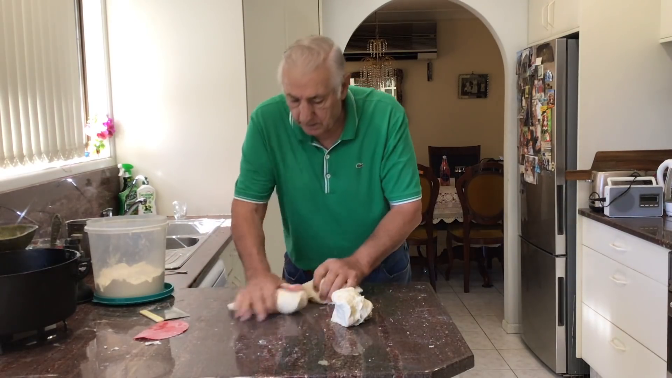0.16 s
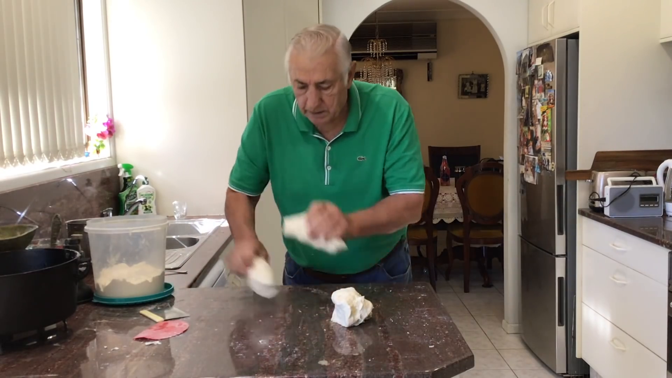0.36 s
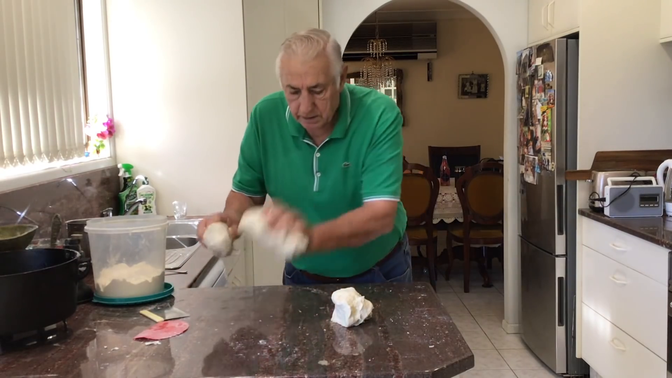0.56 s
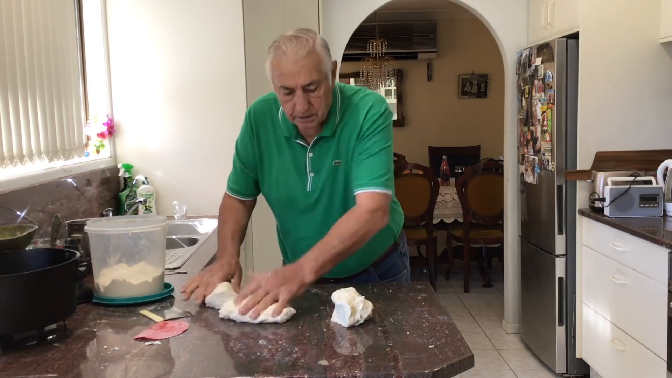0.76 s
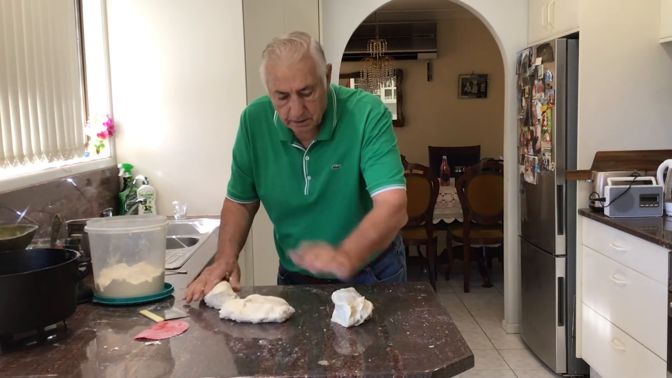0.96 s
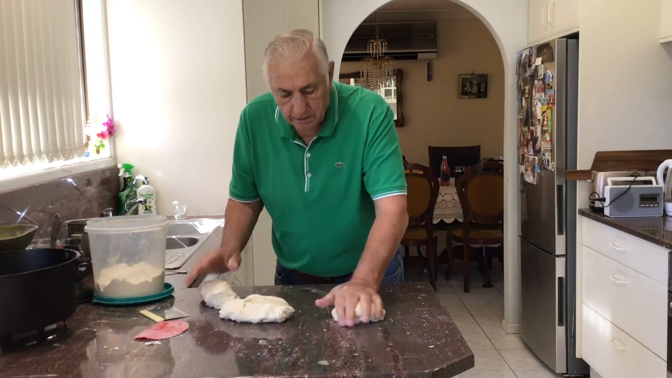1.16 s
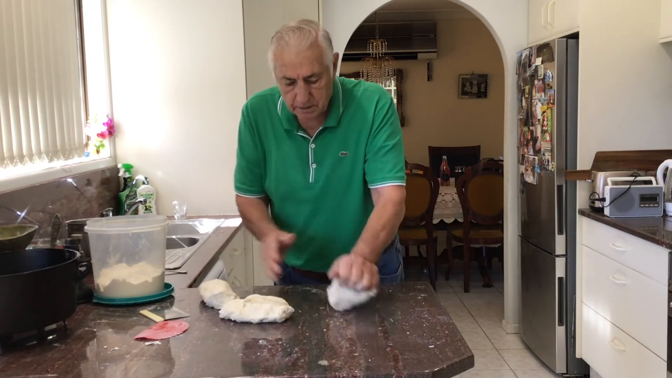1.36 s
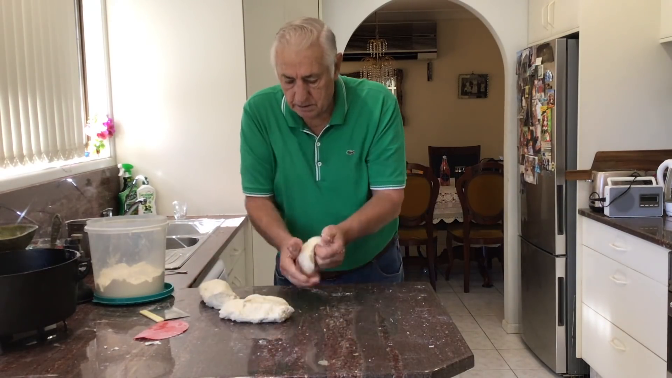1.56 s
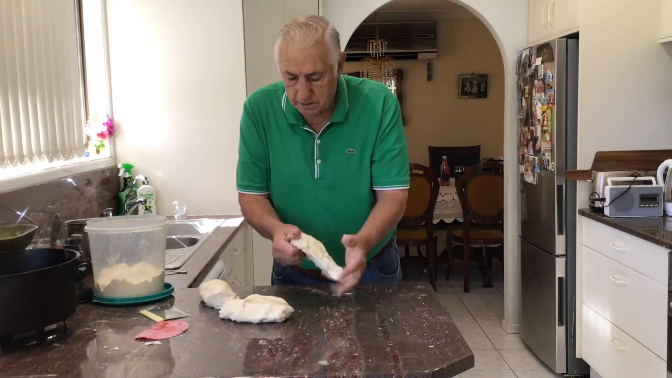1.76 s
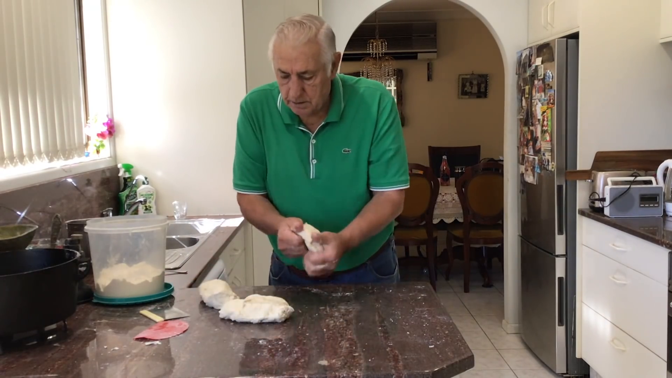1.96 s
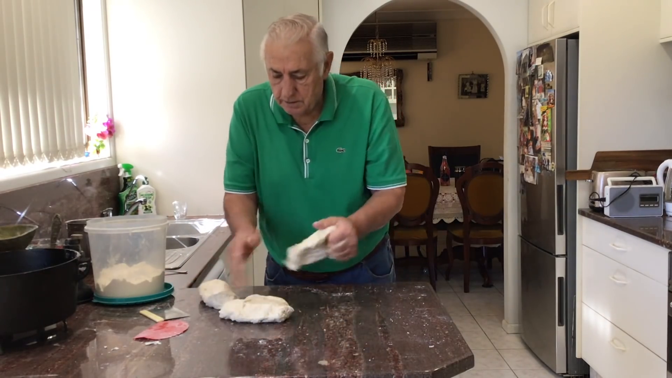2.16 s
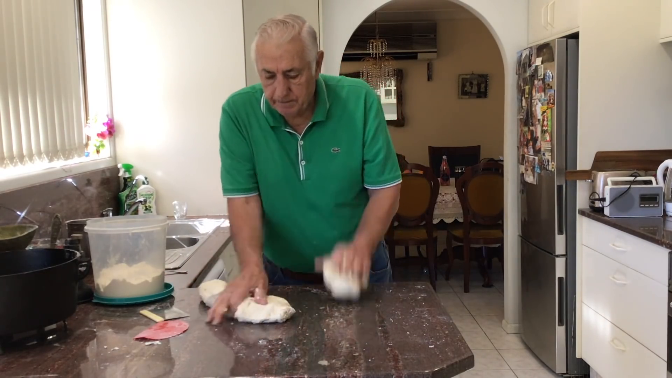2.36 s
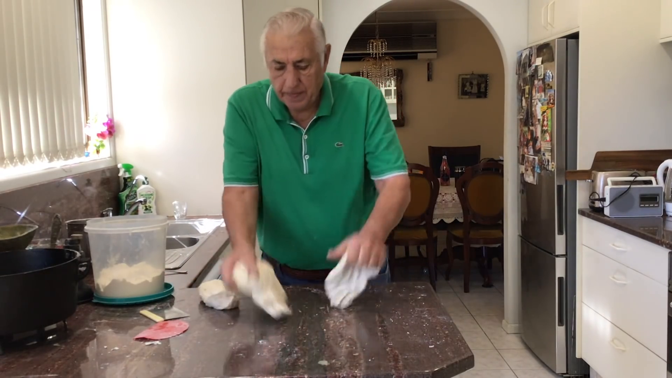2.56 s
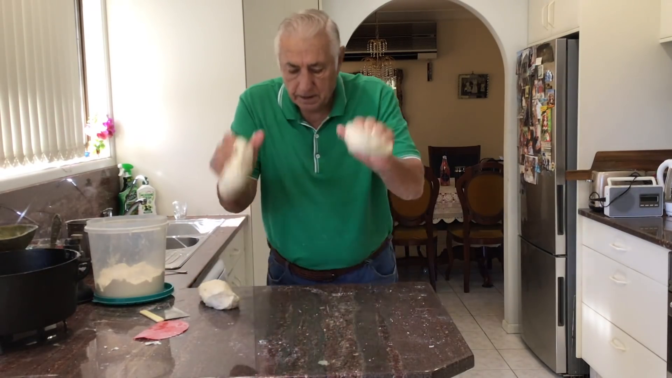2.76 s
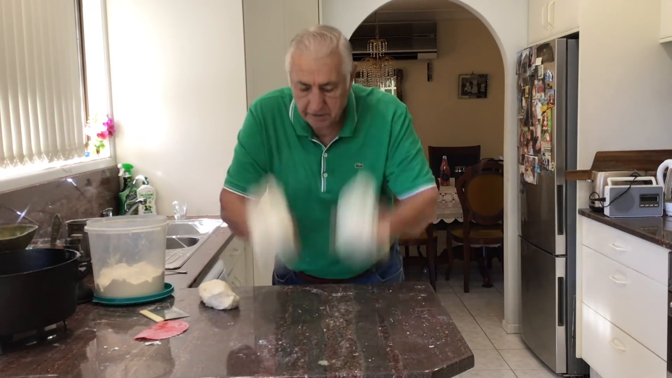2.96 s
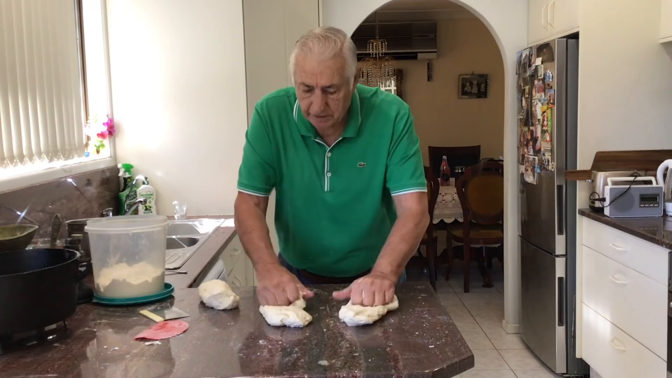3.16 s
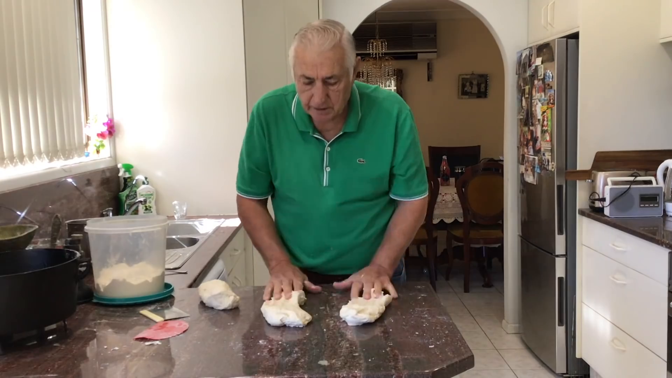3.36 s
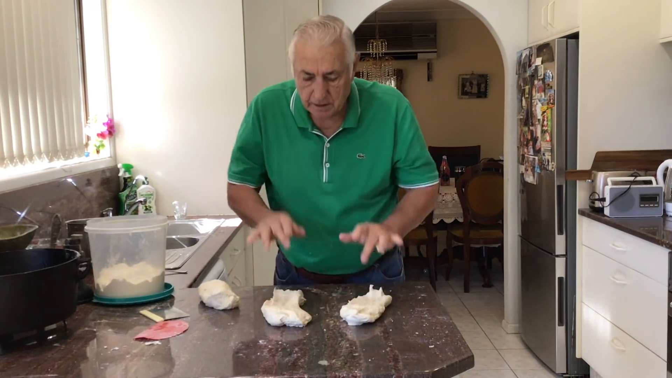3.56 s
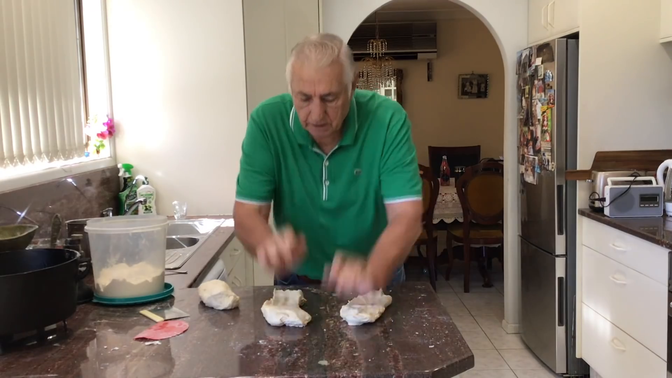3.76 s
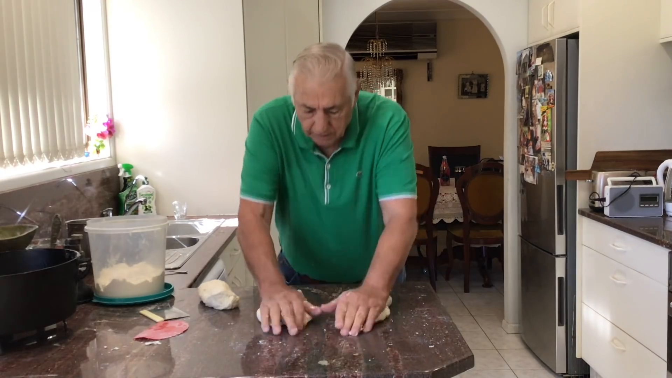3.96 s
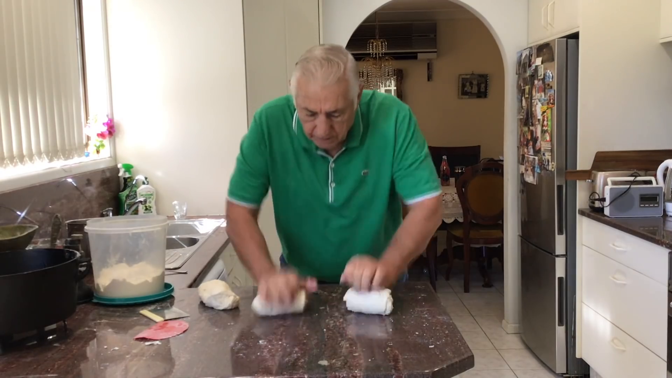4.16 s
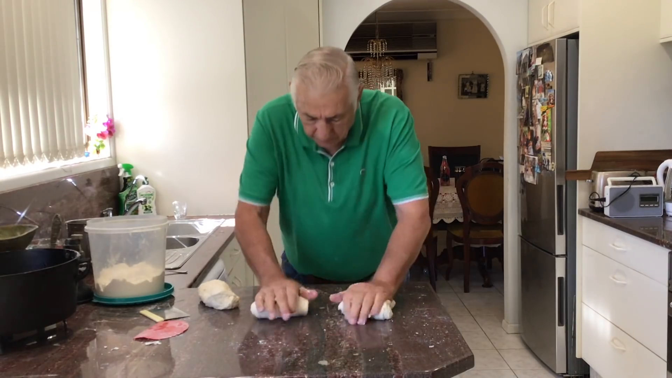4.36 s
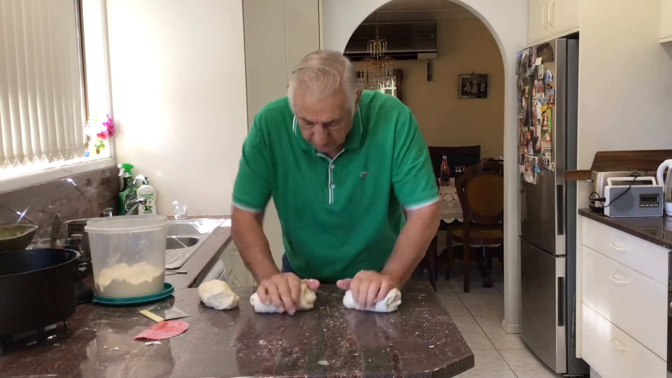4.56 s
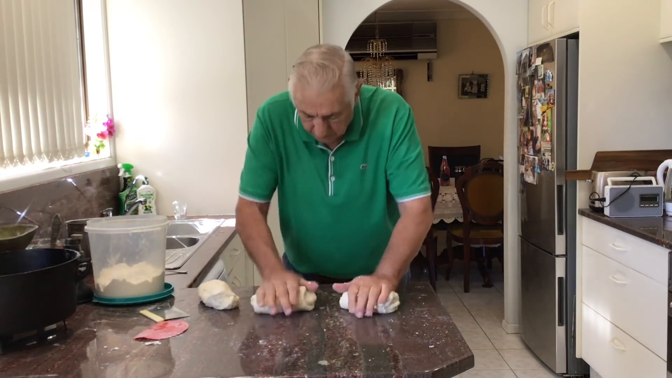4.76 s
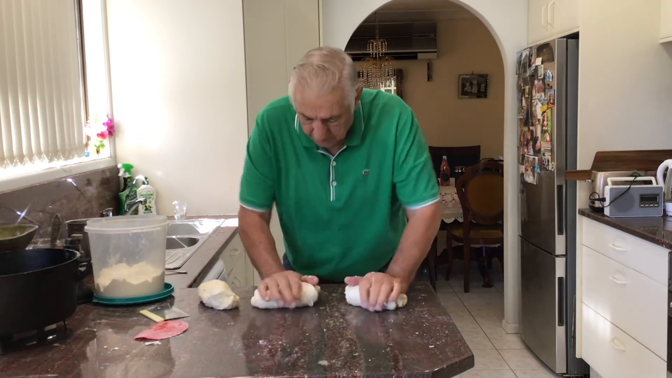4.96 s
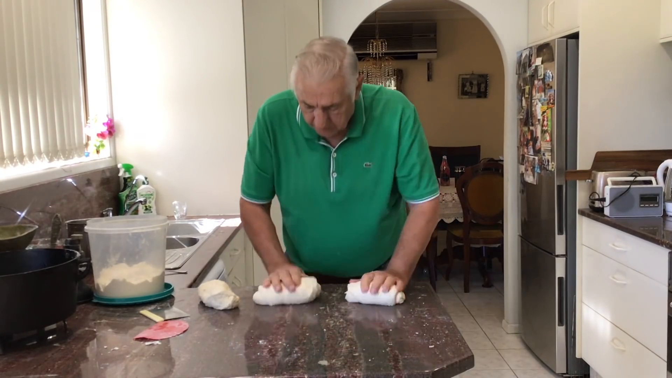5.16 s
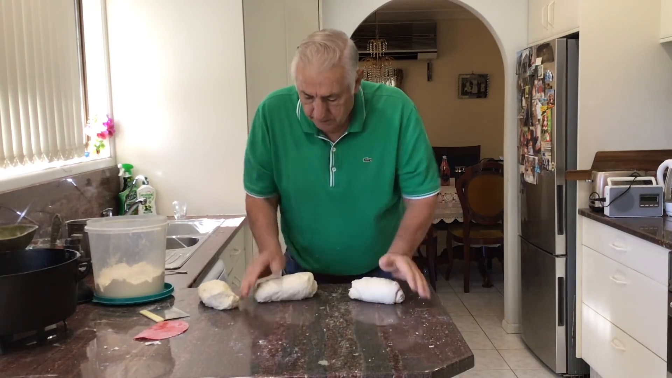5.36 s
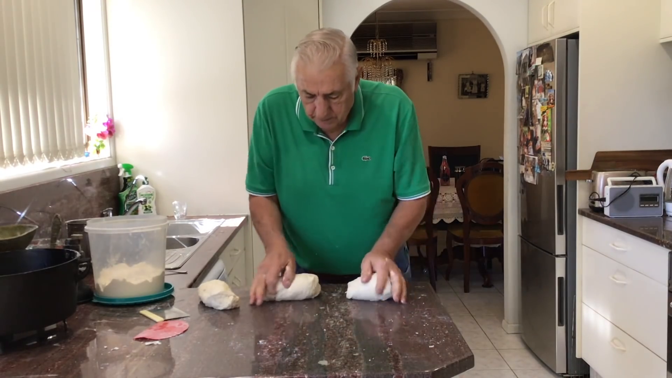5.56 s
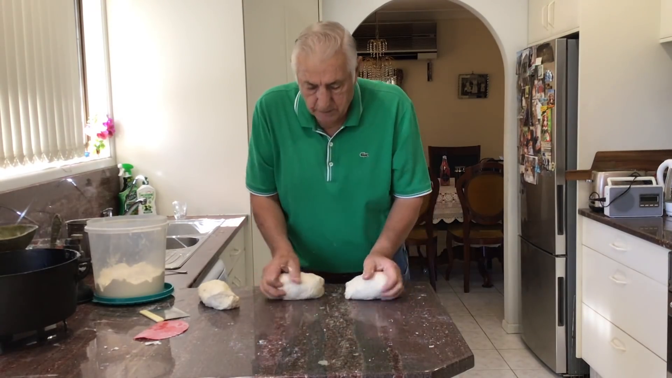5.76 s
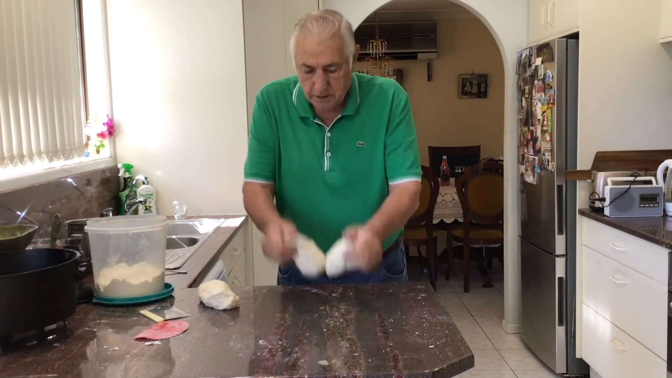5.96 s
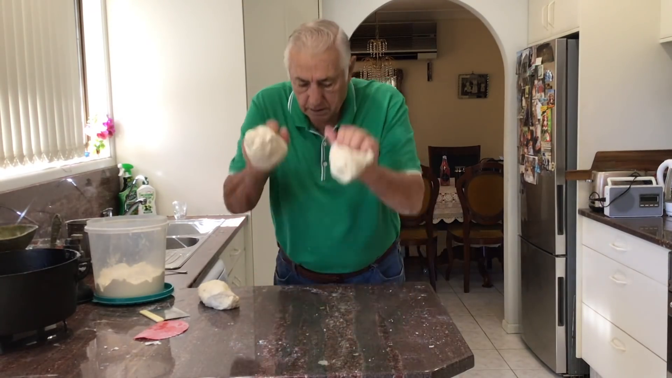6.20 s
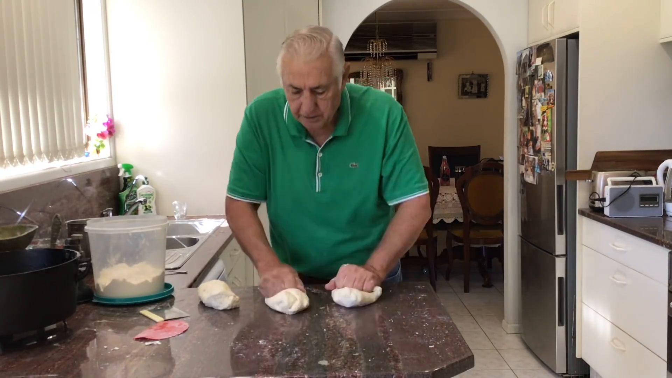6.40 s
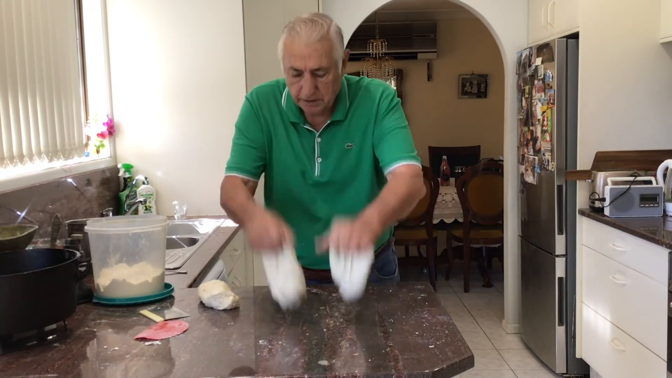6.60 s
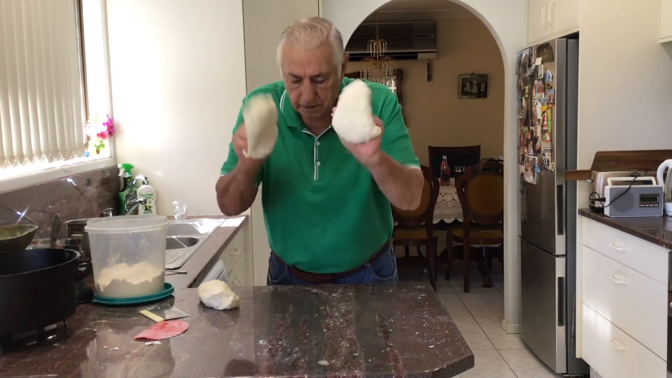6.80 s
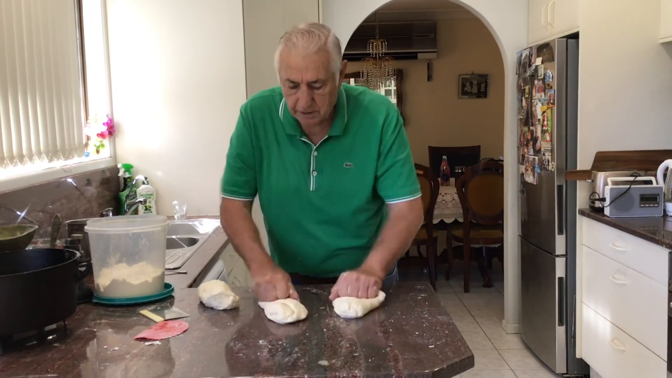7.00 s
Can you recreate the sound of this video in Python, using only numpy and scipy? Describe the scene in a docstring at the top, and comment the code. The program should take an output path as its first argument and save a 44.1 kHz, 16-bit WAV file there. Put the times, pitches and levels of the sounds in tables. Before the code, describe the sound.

In a tiled kitchen, a person works dough on a stone bench. A quiet swish leads to a firm slap, then faint pats and another slap. A very loud double smack cracks and overloads the microphone. Soft patting, pressing and floury rubbing follow with a tiny hard tick, before a second loud double slap. The room echoes briefly over a faint low hum.

```python
"""Dough slapped on a stone bench.

Lumps of dough are slapped, patted and stroked by hand on a stone benchtop in a tiled kitchen.
Each contact is a filtered-impulse smack, a resonant pop of trapped air and a modal thump in the bench,
with reflections and a noise tail. Floury hands swish and press in shaped noise over a quiet noise hum
and faint sine tones; one thin tick is a sum of decaying sines. The loudest peaks clip."""
import sys
import numpy as np
from scipy import signal
from scipy.fft import rfft, irfft, next_fast_len
from scipy.io import wavfile
from scipy.ndimage import uniform_filter1d, map_coordinates

SR = 44100
rng = np.random.default_rng(int(sys.argv[2]) if len(sys.argv) > 2 else 0)


def attenuation_scalar(level_db):
    """Turn a level in dB into a linear amplitude multiplier (20 dB per decade)."""
    decades = np.asarray(level_db, float) / 20
    return 10 ** decades


def transcribe(u):
    """Save the signal u as a 16-bit wav file named by the first command-line argument.

    u: samples, shape (n,) or (channels, n), limited to [-1, 1]; the rate is SR.
    q: integer samples, one column per channel.
    """
    v = np.clip(np.atleast_2d(u).T, -1, 1)
    q = np.round(v * 32767).astype(np.int16)
    wavfile.write(sys.argv[1], SR, q)


N = 310287


def unit(x):
    """Scale to rms 1."""
    return x / np.sqrt(np.mean(x ** 2) + 1e-20)


def along(points, hz):
    """Interpolate (Hz, value) points on a log frequency axis."""
    point_hz, value = np.transpose(points)
    return np.interp(np.log(hz + 1), np.log(point_hz + 1), value)


def filtered(x, response):
    """Multiply the spectrum of x by a complex response of frequency."""
    size = next_fast_len(len(x) + 8192)
    spectrum = rfft(x, size) * response(np.fft.rfftfreq(size, 1 / SR))
    return irfft(spectrum, size)[:len(x)]


def rush(spectrum, patchy_db):
    """Coloured noise of rms 1 whose gain varies in random time-frequency patches."""
    z = signal.stft(rng.standard_normal(N + 512), nperseg=512)[2]
    field = uniform_filter1d(rng.standard_normal(z.shape), 6, axis=0)
    field = uniform_filter1d(field, 8, axis=1)
    noise = signal.istft(z * attenuation_scalar(patchy_db * unit(field)), nperseg=512)[1][:N]
    return unit(filtered(noise, lambda hz: attenuation_scalar(along(spectrum, hz))))


# Swish spectrum. Each row: frequency in Hz, relative density in dB per Hz.
SWISH = [(410, -28.5), (700, -7), (1540, -3.5), (2370, -5), (3070, -6.5), (4610, -8.5), (10100, -13),
         (14000, -15.5), (16000, -23)]
# Pressing spectrum. Each row: frequency in Hz, relative density in dB per Hz.
PRESS = [(24, -42.5), (40, -9), (70, -0.5), (172, -3), (389, 4), (503, 2.5), (806, -8), (1500, -21.5),
         (1950, -45), (3300, -120)]
# Strokes of floury hands over dough and stone.
# Each row: start in seconds, length in seconds, swish in dB rms, pressing in the bench in dB rms.
STROKES = [(0.0, 0.04, -62.5, -63), (0.175, 0.12, -58.5, -57.5), (1.372, .05, -64, -62.5),
           (1.53, 0.13, -72, -61.5), (1.75, 0.12, -66, -64), (2.16, 0.027, -57.5, -81),
           (2.366, 0.041, -63, -59), (2.923, 0.012, -76.5, -61), (3.674, .05, -69, -63),
           (4.08, .12, -58, -63), (4.6, .04, -56.5, -51), (4.852, 0.068, -54.5, -54.5),
           (4.984, 0.03, -63, -63.5), (5.166, 0.14, -61.5, -57), (5.419, 0.18, -69, -57.5),
           (5.849, 0.14, -75.5, -59.5)]
RISE_DB_PER_S, FALL_DB_PER_S = 231, 117.5
REST_SWISH_DB, REST_PRESS_DB = -75.5, -63.5  # hands idling on the dough between strokes


def hands():
    """Flour swishes in fine grains under the palms; kneading presses uneven low lumps into the bench."""
    start_s, length_s, swish_db, press_db = np.transpose(STROKES)[..., None]
    now_s = np.arange(N) / SR
    rise_db = -RISE_DB_PER_S * np.maximum(start_s - now_s, 0)
    fall_db = -FALL_DB_PER_S * np.maximum(now_s - start_s - length_s, 0)

    def level(stroke_db, rest_db):
        power = np.sum(attenuation_scalar(stroke_db + rise_db + fall_db) ** 2, axis=0)
        return np.sqrt(power + attenuation_scalar(rest_db) ** 2)

    grain_db = 1.7 * uniform_filter1d(rng.standard_normal(N), 64) * np.sqrt(64)
    lump_db = 0.8 * map_coordinates(rng.standard_normal(200), [now_s * 25])
    swish = unit(attenuation_scalar(grain_db) * rush(SWISH, patchy_db=-0.5))
    press = unit(attenuation_scalar(lump_db) * rush(PRESS, patchy_db=3.5))
    return level(swish_db, REST_SWISH_DB) * swish + level(press_db, REST_PRESS_DB) * press


# Hum spectrum of the house. Each row: frequency in Hz, relative density in dB per Hz.
HUM = [(15, -58.5), (25, -46.5), (59, 1.5), (229, -3), (373, -16.5), (545, -16), (962, -20), (1100, -19.5),
       (1480, -19.5), (2110, -20), (3250, -25), (12500, -34), (16000, -44.5)]


def hum():
    """Steady house hum: low-weighted noise with patchy gain."""
    hum_db_rms = -60.5
    return attenuation_scalar(hum_db_rms) * rush(HUM, patchy_db=3.0)


# Faint pairs of thin tones in the house.
# Each row: start in seconds, length in seconds, low tone in Hz, high tone in Hz, median level of each in dB rms.
TONES = [(0.0, .25, 1480, 1836, -74), (1.75, .27, 1357, 1720, -74.5), (2.2, .15, 1300, 1700, -78),
         (3.635, .17, 1494, 1763, -76), (5.198, 0.43, 1533, 1796, -78)]
TONE_FADE_S, TONE_WAVER_HZ, TONE_WAVER_DB = 0.074, 20.4, 3.8


def tones():
    """Sine pairs fade in and out and waver in pitch and level."""
    out, now_s = np.zeros(N), np.arange(N) / SR

    def waver():
        return map_coordinates(rng.standard_normal(400), [now_s * 50])

    for start_s, length_s, low_hz, high_hz, db in TONES:
        inside_s = np.minimum(now_s - start_s, start_s + length_s - now_s)
        fade = np.clip(inside_s / TONE_FADE_S + 1, 0, 1)
        for hz in (low_hz, high_hz):
            level = attenuation_scalar(db + TONE_WAVER_DB * waver())
            cycles = np.cumsum(hz + TONE_WAVER_HZ * waver()) / SR
            out += fade * level * np.sqrt(2) * np.sin(2 * np.pi * cycles)
    return out


# Decay of the tiled kitchen. Each row: frequency in Hz, t60 in seconds.
KITCHEN = [(60, 0.76), (160, 0.59), (420, 0.54), (1100, 0.56), (3000, 0.57), (7700, 0.45), (14000, 0.34)]


def kitchen(x, build_s=0.0024, uneven_db=0.92):
    """A fresh noise tail of energy 1: builds up, is unevenly coloured by cupboards and tiles, decays per band."""
    hz, t_s, z = signal.stft(rng.standard_normal(SR), SR, nperseg=512, noverlap=384)
    colour_db = uneven_db * unit(uniform_filter1d(rng.standard_normal(len(hz)), size=3))
    decay_db = -60 * t_s / along(KITCHEN, hz)[:, None]
    z = z * attenuation_scalar(colour_db[:, None] + decay_db)
    tail = signal.istft(z, SR, nperseg=512, noverlap=384)[1][:SR]
    tail *= 1 - np.exp(-np.arange(SR) / SR / build_s)
    return signal.fftconvolve(x, tail / np.linalg.norm(tail))


def causal(gain):
    """Minimum-phase response with this gain, by folding the cepstrum."""
    cepstrum = irfft(np.log(np.maximum(gain, 1e-6)))
    cepstrum[1:len(cepstrum) // 2] *= 2
    cepstrum[len(cepstrum) // 2 + 1:] = 0
    return np.exp(rfft(cepstrum))[:len(gain)]


def resonances(modes, hz):
    """Sum of second-order resonances (centre, width, dB) of alternating sign."""
    total = 0
    for k, (centre, width, db) in enumerate(modes):
        total = total + (-1) ** k * attenuation_scalar(db) * 1j * hz * width / (centre ** 2 - hz * hz + 1j * hz * width)
    return total


# Skin smack spectrum. Each row: frequency in Hz, relative density in dB per Hz.
SMACK = [(200, -27), (900, 0.5), (1500, -3.5), (3000, -6.5), (6000, -11), (11000, -11), (16000, -19)]
# Air under the lump. Each row: ratio to the pop pitch, width as a ratio to the pop pitch, relative level in dB.
POCKET = [(.72, 0.29, 1), (1, 0.29, 5.5), (1.35, 0.32, 0), (2.1, 0.74, -24.5)]
# Modes of slab and cabinets. Each row: frequency in Hz, width in Hz, relative level in dB.
BENCH = [(80.9, 18, -1.5), (163.6, 35, 3), (246, 62, 5), (291, 26, 7.5), (374.4, 34, -5.5)]


def contact(smack_db, peak_hz, width_hz, thump_db, pop_db, pop_hz):
    """Bright smack of the skin as one impulse; pop of escaping air and push of the mass on the bench."""
    t_s = np.arange(SR // 4) / SR

    def push(peak_s):
        return t_s / peak_s * np.exp(1 - t_s / peak_s)

    def smack_response(hz):
        detune = (hz ** 2 - peak_hz ** 2) / (hz * width_hz + 1)
        peak = 1.5 * np.sqrt(2000 / width_hz) / np.sqrt(1 + detune ** 2)  # narrower is taller
        return causal(attenuation_scalar(along(SMACK, hz)) * (1 + peak))

    smack = filtered(1. * (t_s == 0), smack_response)
    pop = filtered(push(0.000083), lambda hz: resonances(POCKET, hz / pop_hz))
    thump = filtered(push(0.00073), lambda hz: resonances(BENCH, hz))
    smack *= attenuation_scalar(smack_db) / np.linalg.norm(smack)
    pop *= attenuation_scalar(pop_db) / np.abs(pop).max()
    thump *= attenuation_scalar(thump_db) / np.abs(thump).max()
    return smack, pop + thump


# Thrown lumps and full palms landing.
# Each row: time in seconds, smack in dB, direct crack in dB re smack, bright peak in Hz,
# air pop in dB peak, air pop in Hz, thump in dB peak.
SLAPS = [(.696, -18.5, 17.5, 4800, -24, 497, -27.5), (2.4506, -21, 25, 9600, -22.5, 540, -31.5),
         (2.577, -34.5, 8.5, 1475, -56, 484, -47.5), (3.0705, -4.5, 18.5, 4700, -14, 705, -16.5),
         (3.085, -3, 8.5, 4540, -13.5, 412, -23), (3.852, -31, 18, 2530, -32.5, 536, -48),
         (3.878, -30.5, 21.5, 4660, -41, 470, -35), (6.379, -17, 14, 3130, -13, 612, -40.5),
         (6.3907, -6, 18, 5960, -7, 568, -18.5)]
SLAP_WIDTH_HZ = 1200  # breadth of the bright peak
# Light touches of palm and fingers.
# Each row: time in seconds, smack in dB, direct crack in dB re smack, bright peak in Hz, air pop in dB peak.
PATS = [(1.063, -42, 19, 2480, -42), (1.088, -50.5, 22.5, 3920, -69), (1.518, -49.5, 16, 1580, -55),
        (1.563, -49, 16.5, 1880, -62), (2.046, -54.5, 15, 3530, -55.5), (2.384, -53, 22, 2100, -72),
        (3.048, -39.5, 8, 4630, -52), (4.053, -48, 9.5, 1198, -41.5), (4.224, -43.5, 5, 1490, -44.5),
        (4.268, -36.5, 13.5, 2750, -42.5), (4.423, -44, 7, 3480, -46), (4.492, -34.5, 10.5, 6900, -60),
        (4.823, -46, 14, 1530, -46.5), (4.986, -46, 19, 1904, -45), (7.013, -34.5, 2, 2980, -37.5)]
PAT_WIDTH_RATIO, PAT_THUMP_DB_RE_POP, PAT_POP_HZ = 0.7, -8, 620  # width re peak pitch


def contacts():
    """Slaps and pats as rows: s, smack dB, crack dB, peak Hz, width Hz, thump dB, pop dB, pop Hz."""
    rows = []
    for s, smack_db, crack_db, peak_hz, pop_db, pop_hz, thump_db in SLAPS:
        rows.append((s, smack_db, crack_db, peak_hz, SLAP_WIDTH_HZ, thump_db, pop_db, pop_hz))
    for s, smack_db, crack_db, peak_hz, pop_db in PATS:
        thump_db = pop_db + PAT_THUMP_DB_RE_POP
        rows.append((s, smack_db, crack_db, peak_hz, PAT_WIDTH_RATIO * peak_hz, thump_db, pop_db, PAT_POP_HZ))
    return rows


# Metal pot shaken by the bench. Each row: frequency in Hz, level in dB re smack, t60 in seconds.
POT = [(976, -23.5, 0.5), (1384, -35, 0.37)]
# First reflections. Each row: delay in seconds, level in dB re direct.
WALLS = [(.0023, -17), (.005, -19), (.009, -18), (0.013, -15.5)]


def blows():
    """Every contact with its first reflections, its room tail and the faint ring of the pot."""
    room_smack_db, room_body_db = 21.5, 9.0
    out, t_s = np.zeros(N + 2 * SR), np.arange(SR) / SR
    pot = sum(attenuation_scalar(db - 60 * t_s / t60_s) * np.sin(2 * np.pi * hz * t_s) for hz, db, t60_s in POT)
    for start_s, smack_db, crack_db, *colour in contacts():
        smack, body = contact(smack_db, *colour)
        at = round(start_s * SR)
        wet = kitchen(attenuation_scalar(room_smack_db) * smack) + kitchen(attenuation_scalar(room_body_db) * body)
        wet[:SR] += attenuation_scalar(smack_db) * pot
        out[at:][:len(wet)] += wet
        # the skin lands in several tiny claps; a harder blow spreads them longer
        clap_t60_s = 0.004 + 0.083 * attenuation_scalar(smack_db)
        claps = attenuation_scalar(-60 * t_s[:300] / clap_t60_s) * rng.standard_normal(300)
        claps *= rng.random(300) < 0.25
        claps[0] = 1.3
        crack = signal.fftconvolve(smack, claps / np.linalg.norm(claps))[:len(body)]
        hit = body + attenuation_scalar(crack_db) * crack
        out[at:][:len(hit)] += hit
        for delay_s, wall_db in WALLS:
            out[at + round(delay_s * SR):][:len(hit)] += attenuation_scalar(wall_db) * hit
    return out[:N]


# One thin tick on something small and hard: time in seconds, level in dB.
TICK = (4.492, -40)
# Its modes. Each row: frequency in Hz, level in dB re tick, t60 in seconds.
TICK_RING = [(1500, -14, 0.15), (2861, 3, 0.041), (2980, -6, 0.054), (5100, -0.5, 0.03), (5410, -2, 0.026),
             (7250, -3.5, 0.027)]


def tick():
    """Short decaying sine modes, heard directly and through the room."""
    start_s, tick_db = TICK
    room_db = 2.5
    out, t_s = np.zeros(N + 2 * SR), np.arange(SR // 2) / SR
    ring = np.zeros(len(t_s))
    for hz, db, t60_s in TICK_RING:
        ring += attenuation_scalar(tick_db + db - 60 * t_s / t60_s) * np.sin(2 * np.pi * hz * t_s)
    wet = kitchen(attenuation_scalar(room_db) * ring)
    wet[:len(ring)] += ring
    out[round(start_s * SR):][:len(wet)] = wet
    return out[:N]


def scene():
    """Hands, blows and a tick over the hum and tones of the house, in mono."""
    return (hands() + hum() + tones() + blows() + tick())[None]


def band_limit(x):
    """A steep low-pass at the top of the band."""
    return signal.sosfilt(signal.butter(12, 16390, fs=SR, output="sos"), x)


def record(dry):
    """The small microphone loses the deepest bass; the loudest slaps overload its input and clip."""
    highpass = signal.butter(2, 38, "highpass", fs=SR, output="sos")
    bass_cut = signal.sosfilt(highpass, dry)
    clipped = bass_cut / (1 + np.abs(bass_cut / 1.05) ** 8) ** (1 / 8)  # ceiling 1.05
    return band_limit(clipped)


dry = scene()
out = record(dry)
transcribe(out)
```